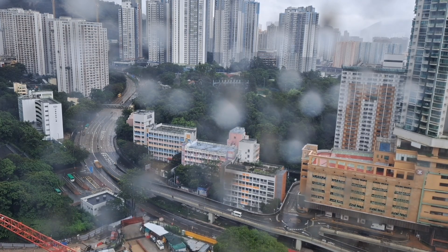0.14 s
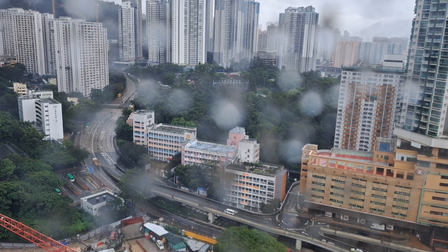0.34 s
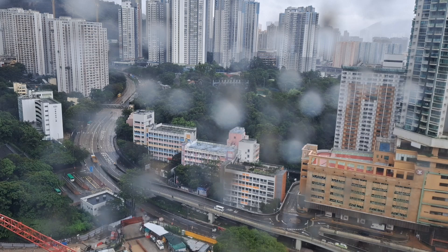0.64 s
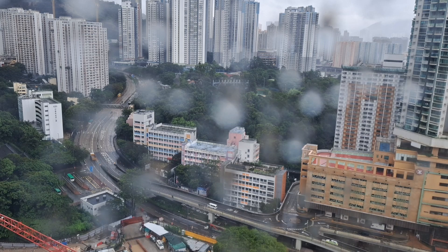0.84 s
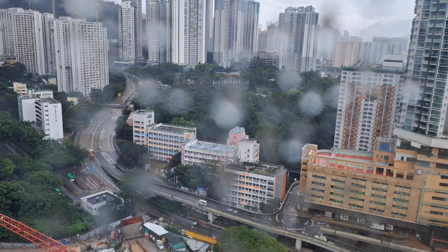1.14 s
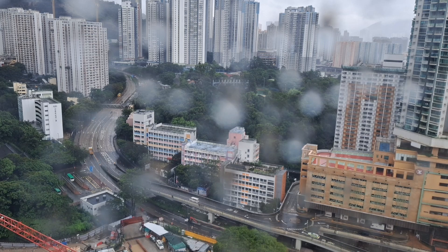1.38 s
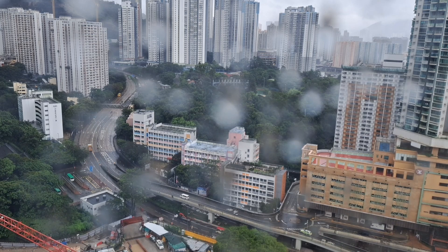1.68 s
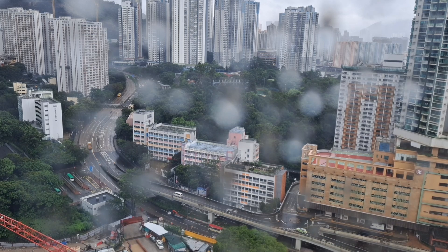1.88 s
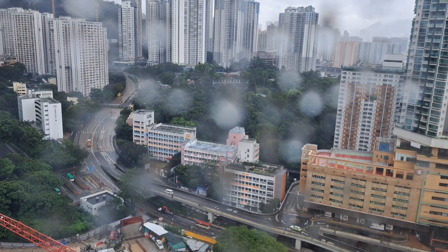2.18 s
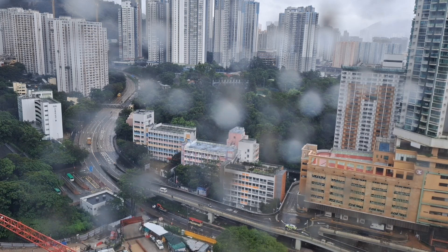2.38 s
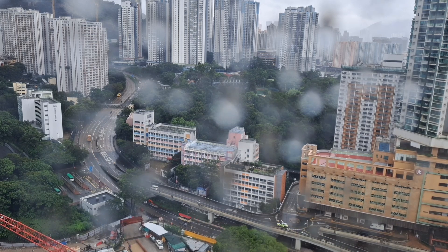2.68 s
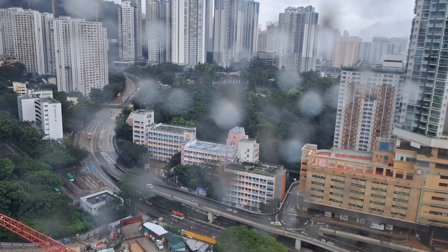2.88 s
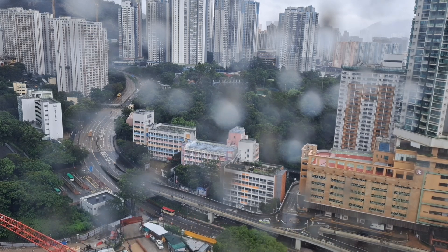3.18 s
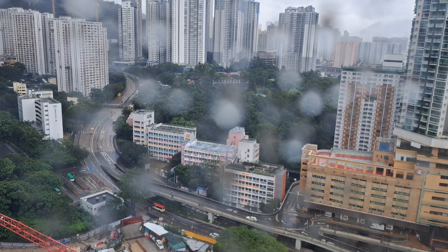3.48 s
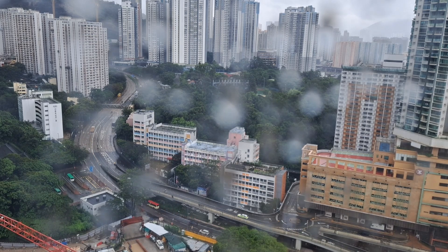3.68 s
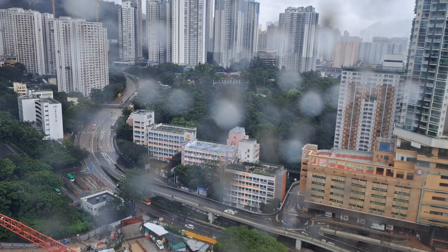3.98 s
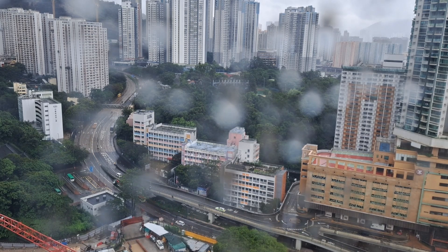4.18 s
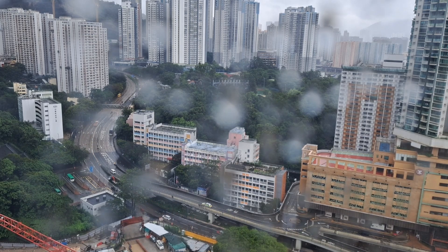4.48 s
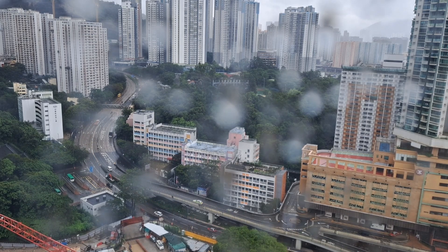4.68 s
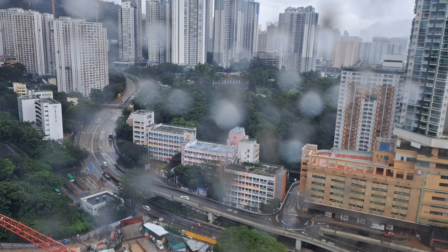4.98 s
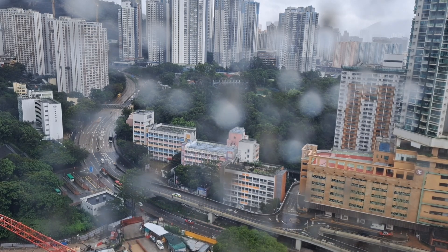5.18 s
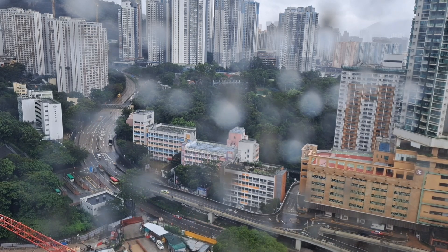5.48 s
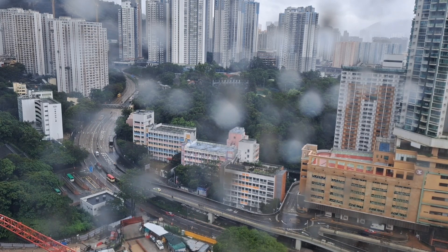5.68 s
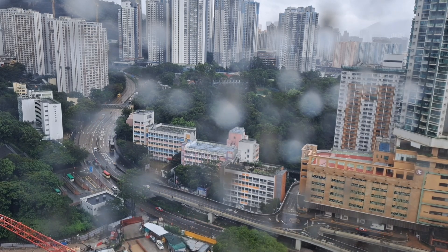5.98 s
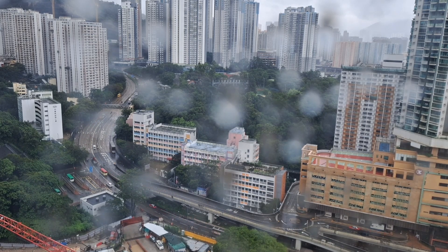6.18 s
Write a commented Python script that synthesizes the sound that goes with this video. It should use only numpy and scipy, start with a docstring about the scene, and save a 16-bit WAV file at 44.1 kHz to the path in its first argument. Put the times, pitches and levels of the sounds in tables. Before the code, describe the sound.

Distant traffic on wet roads heard inside a high flat behind a closed window. A deep, muffled rumble runs throughout, its low booms swelling and dipping irregularly. Soft tyre spray is a little nearer at first, then mostly sinks back after about two seconds. A few faint, thin tones ring briefly. Wide stereo bass drifts between the ears; very quiet microphone hiss lies beneath.

```python
"""Distant road traffic on a wet day, heard behind the closed window of a high flat.
From the start, pane and room turn the roar into three low booms and a row of narrow resonances, all shaped noise.
Tyre spray hisses over them, nearer at first and then mostly sinking back; from 1.4 s three short thin tones ring.
Both ears get the same bass swells, in phases that slip in and out of step; microphone noise lies under it all."""
import sys
import numpy as np
from scipy import signal
from scipy.fft import rfft, irfft, next_fast_len
from scipy.io import wavfile
from scipy.ndimage import uniform_filter1d, map_coordinates

SR = 44100
rng = np.random.default_rng(int(sys.argv[2]) if len(sys.argv) > 2 else 0)


def master(y):
    """Save y as 16-bit WAV."""
    cut = np.clip(np.atleast_2d(y).T, -1, 1)
    pcm = np.round(cut * 32767)  # scale
    wavfile.write(sys.argv[1], SR, pcm.astype(np.int16))


N = 279594
T = np.arange(N) / SR

# Valleys that part the three booms. Each entry: edge in Hz.
BOOM_EDGES_HZ = [34, 85, 165, 270]
# How much louder each boom is on the right. Each entry: gain in dB.
BOOM_RIGHT_DB = [2.5, 1.6, 1.5]
# Low resonances of pane and room; the booms take their shape from the left column, then get their own level.
# Each row: centre in Hz, width at -6 dB in Hz, left peak in dB per Hz, right peak in dB per Hz.
LOW_MODES = [(51.4, 13, -59, -50.5), (125.4, 21.5, -50.5, -48.5), (208.2, 57, -56.5, -62.5),
             (219.7, 25.2, -48, -58)]
# Level of the low, middle and high boom, one curve each. Each row: time in seconds, level in dB.
BOOM_LEVELS = [
    [(0.0, -58), (0.1, -46.4), (0.24, -46), (0.38, -42), (0.64, -50), (0.76, -43), (0.98, -51), (1.06, -44),
     (1.16, -48.7), (1.48, -44), (1.7, -50), (1.76, -42), (2.08, -50), (2.18, -43), (2.42, -49.5),
     (2.52, -39), (2.7, -40.5), (2.78, -46), (3.06, -37.5), (3.34, -49.5), (3.42, -44), (3.58, -44),
     (3.66, -48.5), (3.8, -40), (3.92, -41.5), (4.08, -41.5), (4.18, -36), (4.26, -43), (4.34, -35.5),
     (4.54, -55), (4.7, -37.5), (4.78, -47.5), (4.9, -41), (4.98, -49), (5.08, -42.3), (5.28, -47),
     (5.38, -39), (5.5, -50), (5.64, -38.5), (5.72, -56.5), (5.8, -40.5), (5.9, -48.9), (5.98, -44),
     (6.1, -50.1), (6.24, -37.5), (6.32, -45)],
    [(0.0, -35), (0.14, -36.5), (0.2, -40.5), (0.34, -41), (0.54, -33), (0.6, -39.5), (0.72, -36),
     (0.78, -42.5), (0.84, -39), (1.02, -37.5), (1.1, -41), (1.2, -38), (1.36, -39.5), (1.54, -36),
     (1.66, -39.5), (1.82, -35.5), (1.88, -41), (2.02, -36), (2.1, -47.5), (2.2, -39.5), (2.3, -38.5),
     (2.38, -47), (2.44, -40), (2.62, -39.5), (2.68, -36.5), (2.92, -43.5), (3.14, -36), (3.32, -45),
     (3.38, -37.5), (3.6, -36.5), (3.68, -41), (3.76, -37), (3.86, -39), (3.94, -40.5), (4.1, -36.5),
     (4.32, -44), (4.38, -35.5), (4.46, -40), (4.6, -34), (4.74, -43.5), (4.96, -38), (5.16, -39),
     (5.3, -37), (5.38, -37.5), (5.44, -40), (5.56, -39), (5.64, -36.5), (5.72, -40), (5.82, -37.5),
     (5.9, -46.5), (6.0, -37), (6.06, -48), (6.14, -34.5), (6.32, -41)],
    [(0.0, -40.5), (0.16, -44.5), (0.22, -38.5), (0.46, -38.5), (0.6, -44.5), (0.72, -37), (0.84, -45),
     (0.92, -40), (1.14, -42.5), (1.32, -37.5), (1.62, -44), (1.68, -37.5), (1.82, -41.5), (2.16, -40),
     (2.24, -39.5), (2.36, -38), (2.5, -34), (2.56, -43.5), (2.66, -32), (2.74, -37), (3.1, -38),
     (3.34, -45.5), (3.44, -35.5), (3.54, -39.5), (3.7, -36.5), (3.98, -37), (4.14, -37), (4.2, -41.5),
     (4.34, -36.5), (4.44, -41), (4.62, -38.5), (4.7, -46), (4.8, -34), (4.88, -36.5), (5.28, -38.5),
     (5.44, -38.5), (5.5, -45), (5.58, -38.2), (5.68, -44), (5.74, -36.0), (5.9, -39.5), (6.14, -39.5),
     (6.22, -47), (6.32, -37)],
]
# The left ear's lead in each boom, whole turns being in step. Each row: start in seconds, lead in turns.
BOOM_LEADS = [
    [(0.0, 0.39), (0.3, -0.027), (0.62, 0.35), (0.68, 0.032), (0.82, 0.36), (1.14, 0.75), (1.34, 0.29),
     (1.56, 0.0023), (2.36, -0.25), (2.46, 0.07), (2.56, 0.18), (2.84, 0.13), (3.24, -0.15), (3.34, -0.53),
     (3.5, -0.37), (3.68, -0.18), (3.74, -0.17), (3.84, 0.31), (3.9, 0.37), (3.98, 1.1), (4.06, 1.23),
     (4.22, 1.4), (4.3, 1.21), (4.4, 0.75), (5.02, 0.55), (5.16, 0.62), (5.34, 0.55), (5.52, 0.47),
     (5.6, 0.22), (5.76, -0.01), (5.86, -0.47), (6.18, -0.47)],
    [(0.0, 0.23), (0.14, -0.2), (0.2, 0.6), (0.28, 0), (0.52, -0.14), (0.62, 0.3), (0.68, -0.0),
     (0.78, 1.1), (0.88, 0.5), (1.1, 1), (1.16, 0.25), (1.26, -0.9), (1.5, -1), (1.62, -1.1), (2.1, -1.9),
     (2.26, -1.1), (2.48, -0.5), (2.6, -1.36), (2.84, -1.1), (2.92, -2.5), (2.98, -3), (3.18, -3),
     (3.52, -2.5), (3.58, -3), (3.82, -2.5), (3.98, -3), (4.06, -3), (4.22, -3.5), (4.3, -3), (4.36, -2.5),
     (4.48, -3.65), (4.66, -3.24), (4.76, -2), (4.98, -2), (5.12, -2), (5.24, -2.5), (5.36, -2.5),
     (5.6, -3), (5.7, -1.5), (5.78, -2), (5.88, -2.5), (6.1, -2.5)],
    [(0.0, -0.045), (0.18, -0.3), (0.26, -0.414), (0.32, -0.59), (0.44, -0.88), (0.82, -0.71), (0.88, -0.7),
     (1.08, -0.85), (1.34, -0.38), (1.42, -0.054), (1.6, 0.4), (1.82, -0.081), (2.0, -0.49), (2.26, -0.053),
     (2.48, -0.15), (2.58, -0.38), (2.72, -0.4), (2.78, 0.024), (2.88, 0.17), (2.94, 0.29), (3.1, -0.21),
     (3.22, 0.33), (3.72, 0.17), (3.82, 0.19), (4.0, 0.18), (4.1, 0.19), (4.56, 0.58), (4.78, 0.68),
     (4.84, 0.71), (5.04, 0.4), (5.18, 0.69), (5.24, 0.49), (5.3, 0.54), (5.36, 0.64), (5.54, 0.17),
     (5.6, 0.052), (5.78, 0.1), (5.88, 0.16), (6.08, 0.29), (6.22, 0.22)],
]
# The wavering tone in each boom. Each entry: level as a ratio to the boom's noise.
TONE_RATIO = [0.7, 0.5, 0.2]
# Pitch of those tones before the middle and high booms wander. Each entry: pitch in Hz.
TONE_HZ = [50.63, 125.2, 220]
# Beats slower than this are smoothed out of each boom. Each entry: span in seconds.
BEAT_SPAN_S = [0.08, 0.06, 0.07]
# The middle boom wanders. Each row: time in seconds, pitch of its tone in Hz.
MIDDLE_BOOM_PITCH = [(0.0, 133), (0.14, 124), (0.21, 132.3), (0.26, 122), (0.88, 130), (0.94, 124),
                     (1.84, 125), (2.1, 119), (2.15, 131), (2.44, 127), (2.51, 116), (2.95, 131),
                     (3.62, 122), (3.89, 127), (4.47, 117), (4.75, 131), (4.91, 119.8), (5.01, 132.9),
                     (5.24, 130), (5.3, 122.9), (5.79, 124.8), (5.93, 144.1), (5.98, 133.9), (6.06, 142),
                     (6.14, 124.2), (6.34, 139.4)]
# The high boom sits lower at first. Each row: time in seconds, shift in Hz.
HIGH_BOOM_SHIFT = [(0, -8), (.75, -7), (1, 3), (1.34, -8), (1.98, 4), (2.66, 4), (2.84, -2), (4.68, 0),
                   (4.8, 4), (5.28, -4), (5.54, 3), (6.34, 2)]

# Narrow resonances of pane and room above the booms.
# Each row: centre in Hz, width at -6 dB in Hz, left peak in dB per Hz, right peak in dB per Hz.
HIGH_MODES = [(310.8, 45.0, -70, -72), (367.7, 35, -70.5, -67), (452.7, 21, -73.5, -77),
              (511.3, 52.0, -78.5, -74.5), (563.7, 80, -77.5, -78.5), (660, 84, -88, -82),
              (785.6, 69.0, -123.0, -81), (921, 28, -120.0, -83.5), (1099, 100, -85, -86),
              (1210.5, 56.0, -80, -81.5), (1321, 69, -84.5, -99.0), (1438, 27.0, -87.5, -92.5),
              (1502, 250, -95.0, -92.5), (1893, 65, -90, -85), (1990, 190.0, -96, -90),
              (2130, 200, -95.5, -96), (2527, 260.0, -103.0, -96), (2796, 150.0, -99.0, -101.0),
              (2973, 35.0, -94.0, -95.5), (3710, 190, -108.0, -111.0), (2725, 56, -99.5, -99),
              (3140, 23, -103, -106), (5120, 220, -117, -117)]
# The roar between the resonances. Each row: frequency in Hz, left level in dB per Hz, right level in dB per Hz.
BETWEEN = [(19.6, -95, -93), (28, -87, -85), (39, -78.5, -75.5), (70.5, -69.5, -62.5), (100, -67.5, -63.5),
           (161, -69, -72.5), (280, -73, -70), (450, -83, -85.5), (616.0, -93.5, -104.0), (880.0, -95, -89),
           (1740, -102.0, -100.0), (2440.0, -104.0, -100.0), (3270, -110.0, -109.0), (5080, -122, -117),
           (6000, -130, -130), (8800, -145, -145)]
# How alike the two ears' noise is. Each row: frequency in Hz, share of the power common to both ears.
ALIKE = [(60, 0.92), (250, 0.51), (500, 0.4), (900, 0.057), (1300, 0.81), (2500, 0.46), (5000, 0.086)]
# Traffic density, heard as the level of the roar. Each row: time in seconds, gain in dB.
ROAR_LEVEL = [(0, 0.5), (1, 0.5), (2, -0.5), (3, 0), (4, 0), (5, -0.5), (6.34, -0.5)]
# Bands of the roar that swell on their own. Each row: lower edge in Hz, upper edge in Hz.
SWELL_BANDS_HZ = [(280, 335), (420, 530), (1050, 1350), (1800, 2200), (62, 105), (700, 950), (3500, 3950),
                  (530, 620), (2900, 3060), (335, 420)]
# One curve for each band, its level swelling and sinking. Each row: time in seconds, gain in dB.
SWELLS = [
    [(0.0, 1), (0.22, 3.5), (0.42, 0), (0.56, -1), (0.86, 0), (1.02, 3), (1.12, -1.5), (1.36, 2.5),
     (1.76, 1.5), (1.86, -4), (2.08, -0.3), (2.28, -1.5), (2.46, 1), (3.34, -3), (3.56, 0), (3.94, 1),
     (4.38, -0.5), (5.0, 2.5), (5.44, -1), (5.9, 1), (6.22, 2.5), (6.32, -3)],
    [(0.0, 0), (0.36, 0.5), (0.84, 2), (1.86, -1), (2.5, -1), (2.66, -4), (2.82, 1), (4.08, 1.5),
     (4.36, -1.3), (4.54, 2), (5.24, -0.3), (5.5, -1.5), (5.8, 2.5), (6.32, 1)],
    [(0.0, -1.5), (0.12, -1.5), (0.68, 2), (1.56, -3.5), (1.88, -4), (2.14, 1), (2.46, -3.5), (2.66, 0),
     (2.98, -2.5), (3.46, 2), (3.78, -1), (4.32, 3.5), (4.68, -1), (4.82, 4.5), (4.96, -0.3), (5.08, 3.5),
     (5.52, 1.2), (6.32, 1.5)],
    [(0.0, 4.5), (0.24, -2.5), (0.58, 1.5), (1.18, -1.5), (1.38, 0), (1.62, 1.5), (1.82, -2.5), (2.3, -0.3),
     (2.62, 4), (2.78, -1), (3.16, 2.5), (3.3, -4.5), (3.82, -0.5), (3.94, 1.5), (4.58, -1.5), (4.72, -1.5),
     (6.04, 0), (6.18, -1.5), (6.32, -1)],
    [(0.0, -4), (0.24, 4), (0.4, -5.4), (0.72, 2.2), (0.86, -2.4), (1.36, 2), (1.66, -3.2), (1.84, 1.5),
     (2.4, -2), (2.54, 4), (2.94, -3.5), (3.24, 6), (3.34, -2), (4.0, 5.5), (4.14, -2), (4.24, 1),
     (4.62, 0.5), (4.82, -3.5), (5.34, 5.5), (5.48, 0.5), (5.96, -1.5), (6.08, -5.5), (6.2, 2), (6.32, 1.5)],
    [(0.0, 1), (1.16, -0.5), (1.48, -3.5), (1.68, 0.3), (2.06, -2.0), (2.18, 1.5), (2.42, 0), (2.54, -1.5),
     (3.92, 1.5), (4.08, -0.5), (5.18, 1), (5.7, -2.5), (5.84, 1), (6.32, 3.5)],
    [(0, -0.5), (3, -1), (3.8, 1), (4.25, -2), (4.62, 6), (4.85, 2.5), (5.35, 1), (5.65, -1), (6.05, 2),
     (6.34, 0)],
    [(0, 1), (.6, 1.5), (1.2, -0.5), (1.8, 1), (2.1, 2), (2.35, 1), (2.47, 5), (2.7, 0), (3.5, -3),
     (3.8, 0), (4.1, -2), (4.6, -1.5), (4.84, 4.5), (5.2, 0), (5.8, 1), (6.34, 0.5)],
    [(0, 0), (.6, -0.5), (1.3, 3.5), (1.8, 1), (2.4, 2.5), (3, -1), (3.7, 1), (4.2, -3), (5, -1.5),
     (5.7, 0), (6.34, -4.5)],
    [(0, -4), (.2, 3), (.45, -1), (.85, 1), (1.1, -1), (1.36, 2), (1.68, 0.5), (1.75, 5.5), (1.84, -5),
     (2.2, -0.5), (2.34, -4.5), (2.46, 4.5), (2.7, -1), (3.45, -3), (3.58, 4), (3.78, -0.5), (4.06, 2.5),
     (4.31, -4.5), (4.58, 5), (4.66, -3), (4.8, 3), (4.88, -6.5), (4.98, 0.5), (5.44, -1), (5.9, 1),
     (6.34, -2.5)],
]

# Tyres on the wet road, one vehicle nearer at first. Each row: time in seconds, gain in dB.
SPRAY_LEVEL = [(0, 2), (.07, 3.5), (.12, 1), (.28, 3.5), (.35, -1.5), (.5, 4), (.76, 3.5), (.84, 5),
               (.9, 4), (.97, 5), (1.08, 0.5), (1.32, -1.5), (1.4, 3), (1.52, -3), (1.78, -7.5), (2.1, -1),
               (2.62, -7.5), (3.34, -11), (3.84, -3), (4.3, -5), (4.62, -1.5), (4.72, -9.5), (5.32, -7),
               (5.9, -12.5), (6.34, -11)]
# Spray is brighter than the roar. Each row: frequency in Hz, gain over the window's response in dB.
SPRAY_COLOUR = [(500, -25.5), (1000, -11), (2000, -6), (3000, 3), (5000, 0.5), (6300, 8), (8000, 17),
                (10000, 9.5)]
# Short thin tones. Each row: start in seconds, pitch in Hz, left level in dB, time to fall by 60 dB in seconds.
PINGS = [(1.4, 1872, -62, 0.9), (3.49, 1550, -49.5, 0.27), (4.3, 1230, -58, 0.5)]
# Microphone noise. Each row: frequency in Hz, left level in dB per Hz, right level in dB per Hz.
HISS = [(20, -130, -130), (4000, -126, -124), (6900, -122, -123), (7060, -122, -118), (10100, -123, -125),
        (12100, -122, -116), (15300, -123, -120)]

SLIP_S = 0.029  # time a slip between the ears takes, seconds
DETUNE = 0.003  # the window's response wanders by this share of its pitch, each way
TOP_HZ = 15500  # band limit of the microphones


def amp(db):
    """dB to gain."""
    return 10 ** (np.asarray(db) / 20)


def unit(x):
    """x at rms 1."""
    return x / np.sqrt(np.mean(np.abs(x) ** 2) + 1e-20)


def along(points, hz):
    """One row of values for each column after the frequency, read on a log axis."""
    f, *columns = np.transpose(points)
    return np.array([np.interp(np.log(hz + 1), np.log(f + 1), c) for c in columns])


def curves(rows):
    """One value per sample for each column after the time."""
    s, *columns = np.transpose(rows)
    return np.array([np.interp(T, s, c) for c in columns])


def held(rows, glide_s):
    """Each value holds, with a short glide across the start of the next row."""
    s, value = np.transpose(rows)
    steps = value[np.clip(np.searchsorted(s, T) - 1, 0, None)]
    return uniform_filter1d(steps, max(round(glide_s * SR), 1))


def smooth(x, span):
    """Two running means over span samples in time."""
    return uniform_filter1d(uniform_filter1d(x, span), span)


def wobble(rate):
    """A smooth random curve, rate knots a second, at most 15."""
    return map_coordinates(rng.standard_normal(100), [T * min(rate, 15)])


def field(shape, bins, frames):
    """A smooth random field over frequency and time, rms 1."""
    rough = uniform_filter1d(rng.standard_normal(shape), round(bins), 0)
    return unit(uniform_filter1d(rough, round(frames), 1))


def filtered(x, response):
    """x shaped by a response of frequency."""
    m = next_fast_len(N + SR // 2)
    return irfft(rfft(x, m) * response(np.fft.rfftfreq(m, 1 / SR)), m)[..., :N]


def above(hz, edge_hz):
    """A soft step from 0 to 1 that is about one half at the edge."""
    return 1 / (1 + (edge_hz / (hz + 1)) ** 24)


def between_edges(hz, low_hz, high_hz):
    """A soft-sided band from one edge to the other."""
    return above(hz, low_hz) * (1 - above(hz, high_hz))


def resonances(modes, hz):
    """Gain for each ear of a row of steep resonances whose powers add; sqrt(SR / 2) turns dB per Hz into gain."""
    power = sum(amp(db)[:, None] ** 2 / (1 + (2 * (hz - centre) / width) ** 2) ** 2
                for centre, width, *db in modes)
    return np.sqrt(power * SR / 2)


def window(hz):
    """Gain of pane and room apart from the booms: narrow resonances over the roar between them."""
    return np.hypot(resonances(HIGH_MODES, hz), amp(along(BETWEEN, hz)) * np.sqrt(SR / 2))


def turning(shift_hz):
    """A rotating phasor that shifts the pitch of a complex signal by a curve in Hz."""
    return np.exp(2j * np.pi * np.cumsum(shift_hz) / SR)


def boom_ringing(k):
    """Noise through one low resonance plus a wavering tone, as a complex signal with only its fast beats left."""
    def band(hz):
        return resonances(LOW_MODES, hz)[0] * np.sqrt(between_edges(hz, *BOOM_EDGES_HZ[k:k + 2]))

    noise = rng.standard_normal(N)
    quarter_turn_twin = filtered(noise, lambda hz: -1j * band(hz))
    ring = unit(filtered(noise, band) + 1j * quarter_turn_twin)
    ring = ring + TONE_RATIO[k] * np.exp(2j * np.pi * (TONE_HZ[k] * T + 0.43 * wobble(2.5)))
    if k == 1:
        ring = ring * turning(curves(MIDDLE_BOOM_PITCH)[0] - TONE_HZ[1])
    if k == 2:
        ring = ring * turning(curves(HIGH_BOOM_SHIFT)[0])
    slow_power = smooth(np.abs(ring) ** 2, max(round(BEAT_SPAN_S[k] * SR), 1))
    return np.sqrt(2) * unit(ring / np.sqrt(np.abs(slow_power) + 1e-12))  # its real part has rms near 1


def booms(lumps_db=0.71, lumps_per_s=5, heave_db=0.26, waver_turns=.03, wavers_per_s=6):
    """Three low resonances ring; each one's swells reach both ears alike, its phase does not."""
    out = np.zeros((2, N))
    heave = heave_db * wobble(6.1)  # quick heaves that all three share
    for k, right_db in enumerate(BOOM_RIGHT_DB):
        ring = boom_ringing(k)
        level_db = curves(BOOM_LEVELS[k])[0] + heave + lumps_db * wobble(lumps_per_s)
        lead_turns = held(BOOM_LEADS[k], SLIP_S) + waver_turns * wobble(wavers_per_s)
        half_angle = np.pi * lead_turns  # left leads by half, right lags by half
        ears = np.real(ring * np.exp(1j * np.array([half_angle, -half_angle])))
        out += amp(level_db) * ears * amp([[0], [right_db]])
    return out


def rush(patchy_db, treble_db):
    """White stereo noise in streaky patches; a shared part reaches the right ear with wandering phase."""
    hz, _, z = signal.stft(rng.standard_normal((2, N + 1024)), SR, nperseg=1024)
    grid = z.shape[1:]
    share = np.clip(along(ALIKE, hz)[0], 0, 1)[:, None]
    wander = np.exp(1j * np.pi * field(grid, 3, 24))
    right = np.sqrt(share) * z[0] * wander + np.sqrt(1 - share) * z[1]
    # the treble flickers in broad patches, fully from 5 kHz up
    flicker_db = treble_db * np.clip(hz / 5000, 0, 1)[:, None] * field(grid, 40, 6)
    streaks_db = patchy_db * field(grid, 3, 8)
    pair = signal.istft(np.array([z[0], right]) * amp(streaks_db + flicker_db), nperseg=1024)[1][:, :N]
    return np.array([unit(ear) for ear in pair])


def roar(even_s=.12):
    """Engines and tyres far below are noise through the window; bands of it swell and sink on their own."""
    lean = np.pi / 4 * (1 + np.tanh(1.2 * wobble(2.5)))  # cross-fade between a lower and a higher tuning
    low = filtered(rush(patchy_db=1.72, treble_db=2.0), lambda hz: window(hz * (1 + DETUNE)))
    high = filtered(rush(patchy_db=1.72, treble_db=2.0), lambda hz: window(hz * (1 - DETUNE)))
    plain = np.cos(lean) * low + np.sin(lean) * high
    out = plain.copy()
    for (low_hz, high_hz), rows in zip(SWELL_BANDS_HZ, SWELLS):
        band = filtered(plain, lambda hz: between_edges(hz, low_hz, high_hz))
        power = np.mean(band ** 2, axis=0)
        slow_power = np.abs(smooth(power, round(even_s * SR))) + 1e-20
        evening = np.sqrt(power.mean() / slow_power)  # levels the noise's own slow swells
        out += (amp(curves(rows)) * evening - 1) * band
    return amp(curves(ROAR_LEVEL)) * out


def spray():
    """The hiss of tyres in the wet is brightened noise through the same pane."""
    def colour(hz):
        return window(hz) * amp(along(SPRAY_COLOUR, hz))

    return amp(curves(SPRAY_LEVEL)) * filtered(rush(patchy_db=1.5, treble_db=1.9), colour)


def pings():
    """Soft-starting sine tones that die away exponentially."""
    out = np.zeros(N)
    for start, hz, db, t60 in PINGS:
        t = np.clip(T - start, 0, None)
        soft_start = 1 - np.exp(-t / 0.033)
        out += amp(db - 60 * t / t60) * soft_start * np.sin(2 * np.pi * hz * t)
    return out * amp([[0], [-8]])  # weaker on the right


def scene():
    """All that passes the window."""
    return booms() + roar() + spray() + pings()


def microphone_hiss():
    """Each microphone adds its own coloured noise, whose level wavers a little."""
    waver_db = .6 * unit(smooth(rng.standard_normal((2, N)), 3000))
    noise = amp(waver_db) * rng.standard_normal((2, N))
    return filtered(noise, lambda hz: amp(along(HISS, hz)) * np.sqrt(SR / 2))


def record(dry):
    """The microphones add their hiss; nothing is kept above the band limit."""
    return filtered(dry + microphone_hiss(), lambda hz: hz < TOP_HZ)


dry = scene()
out = record(dry)
master(out)
```